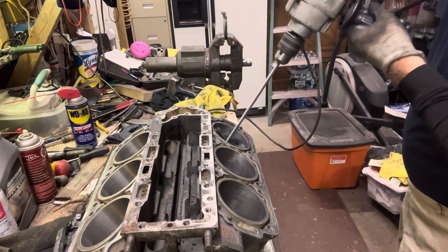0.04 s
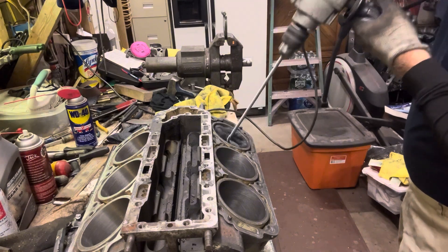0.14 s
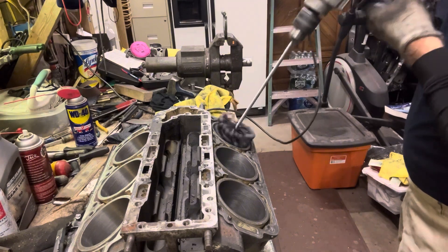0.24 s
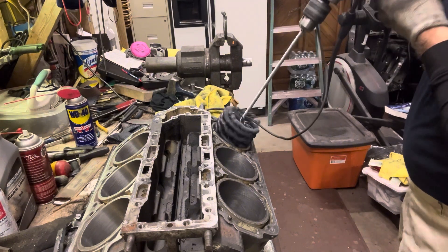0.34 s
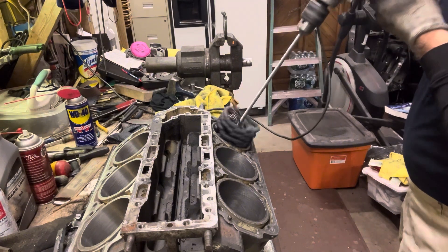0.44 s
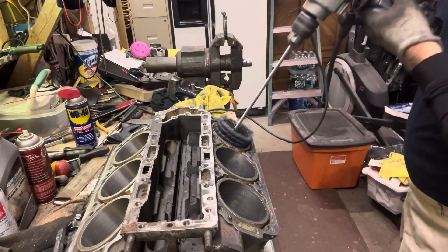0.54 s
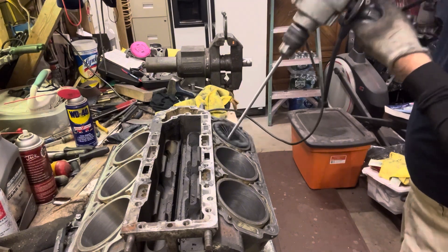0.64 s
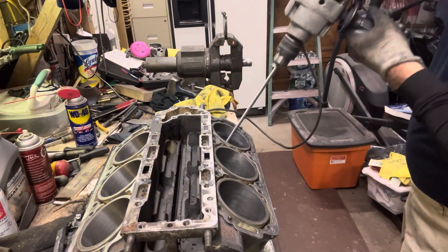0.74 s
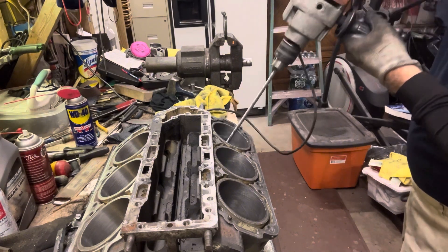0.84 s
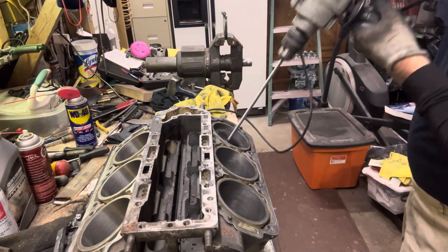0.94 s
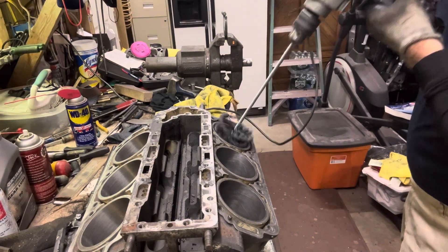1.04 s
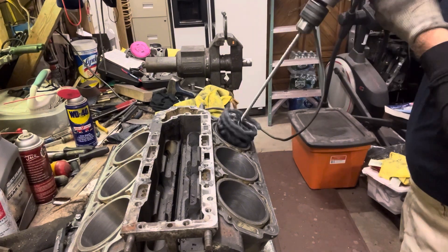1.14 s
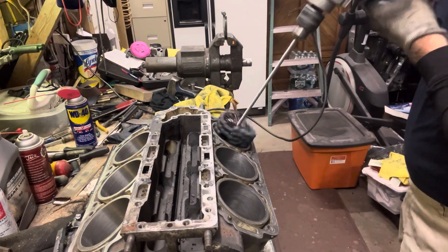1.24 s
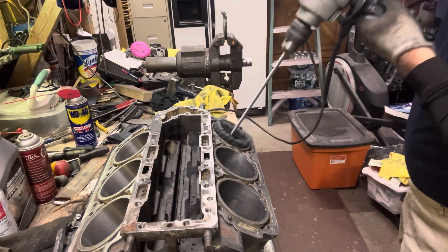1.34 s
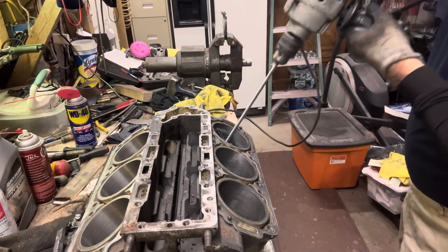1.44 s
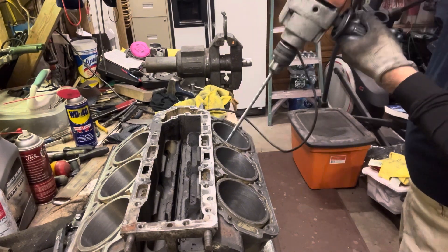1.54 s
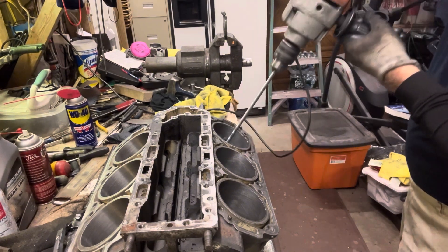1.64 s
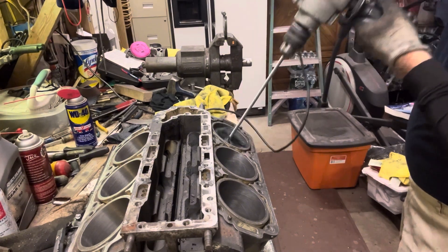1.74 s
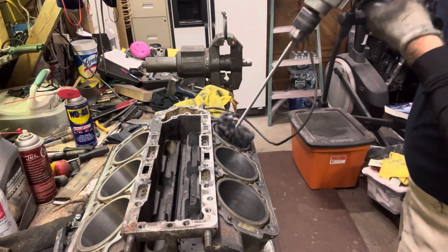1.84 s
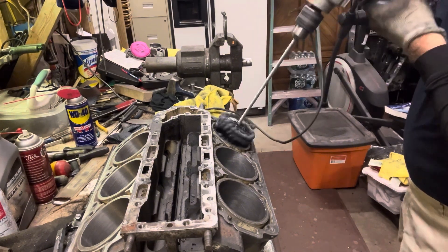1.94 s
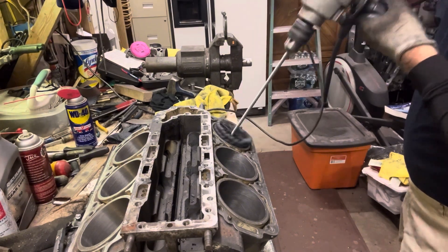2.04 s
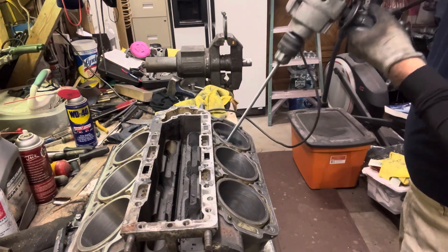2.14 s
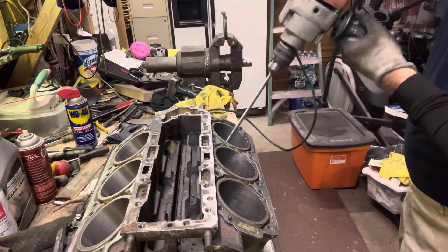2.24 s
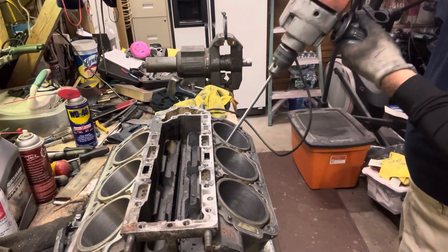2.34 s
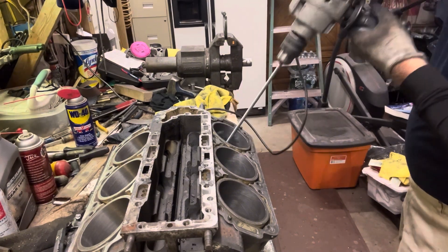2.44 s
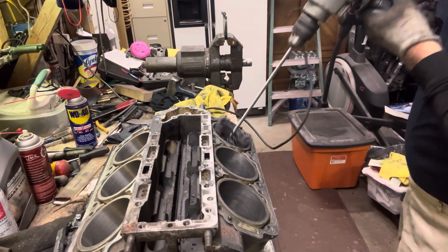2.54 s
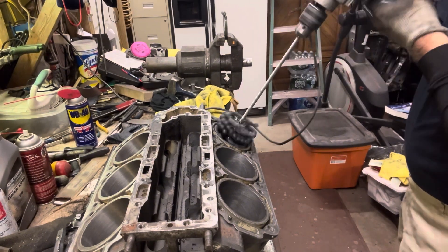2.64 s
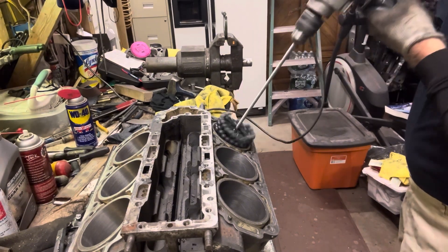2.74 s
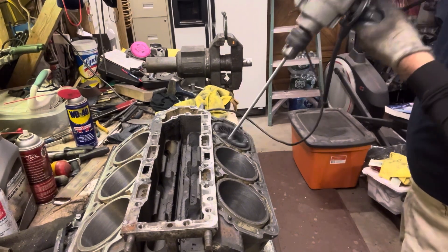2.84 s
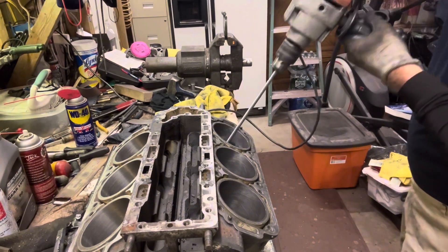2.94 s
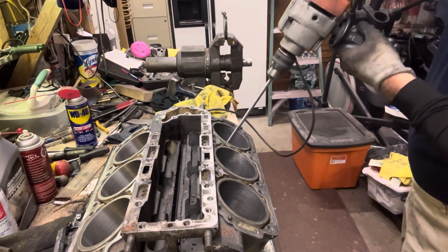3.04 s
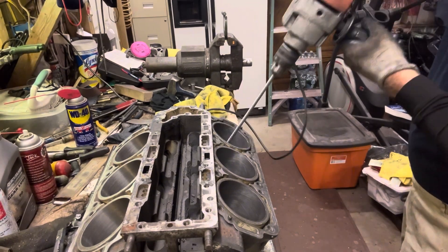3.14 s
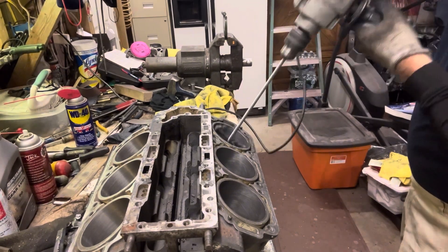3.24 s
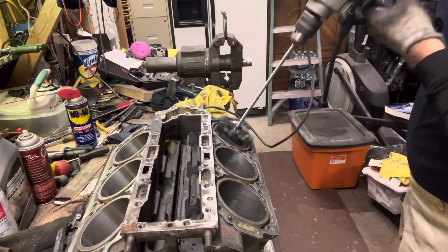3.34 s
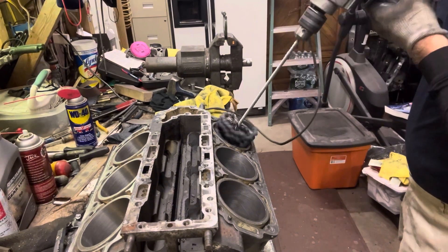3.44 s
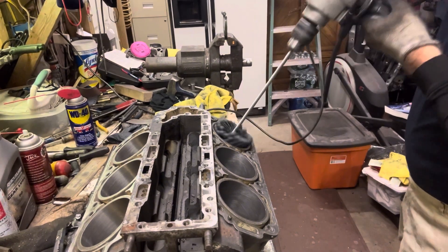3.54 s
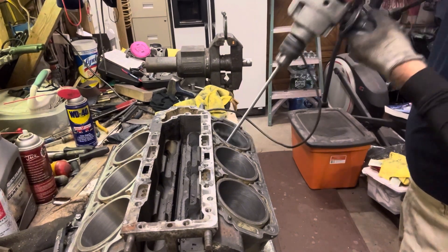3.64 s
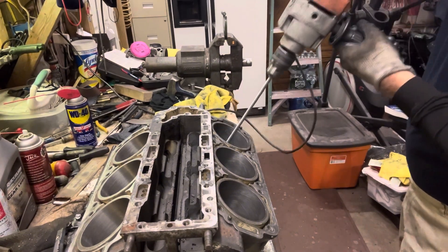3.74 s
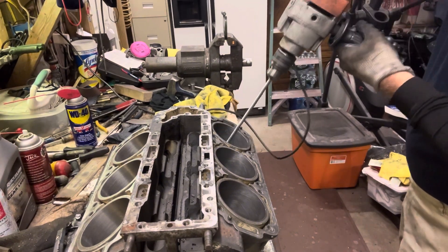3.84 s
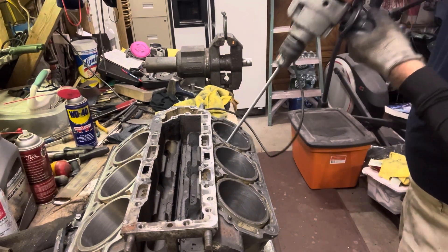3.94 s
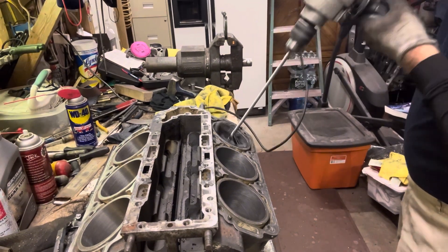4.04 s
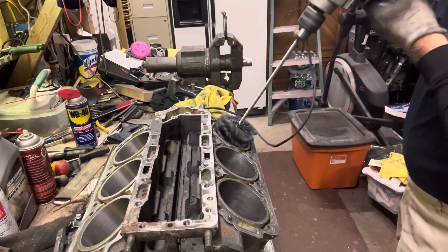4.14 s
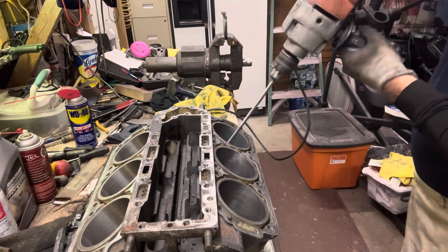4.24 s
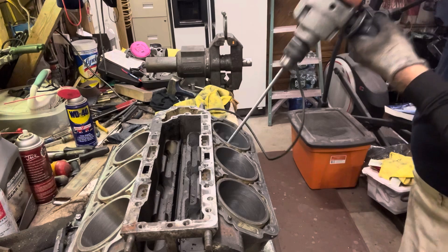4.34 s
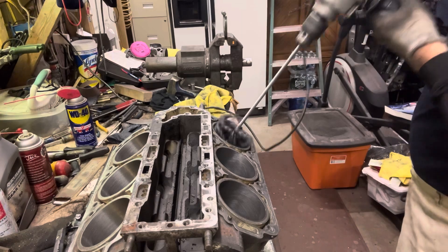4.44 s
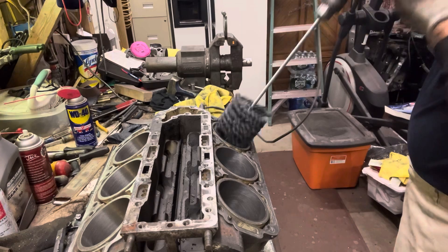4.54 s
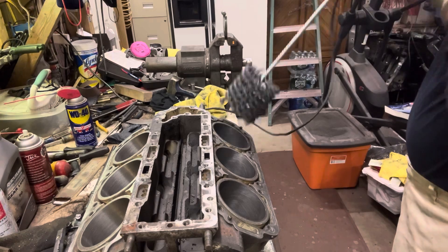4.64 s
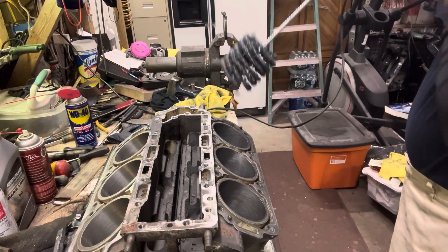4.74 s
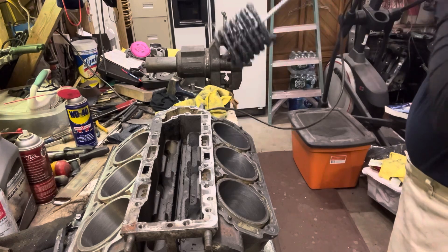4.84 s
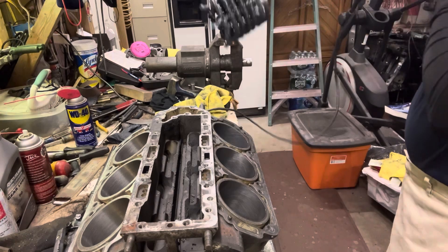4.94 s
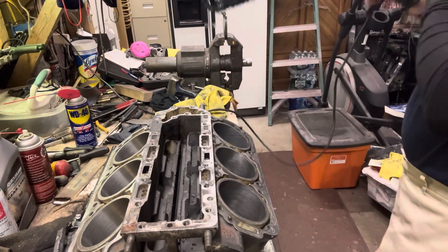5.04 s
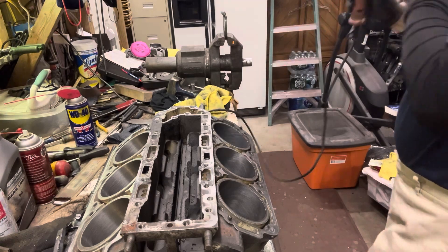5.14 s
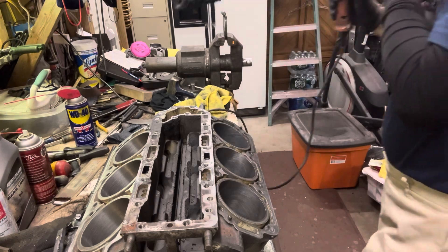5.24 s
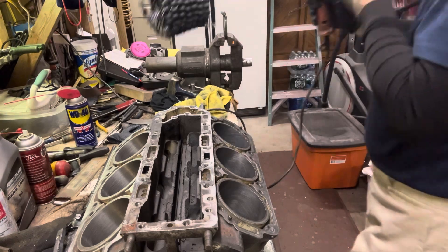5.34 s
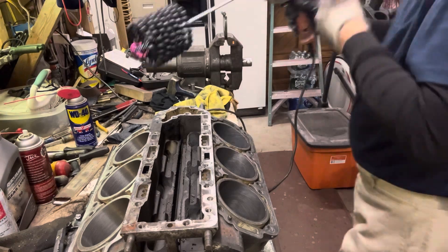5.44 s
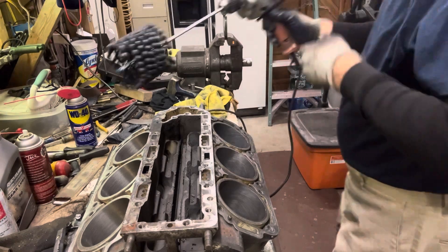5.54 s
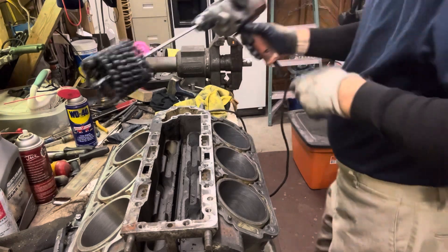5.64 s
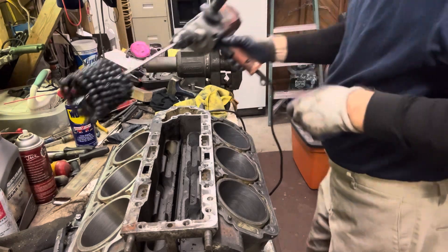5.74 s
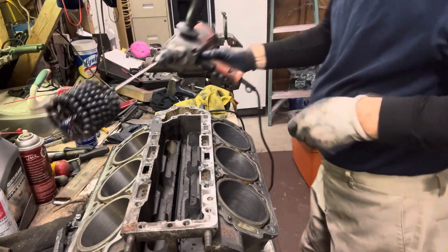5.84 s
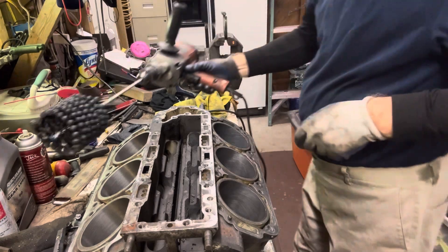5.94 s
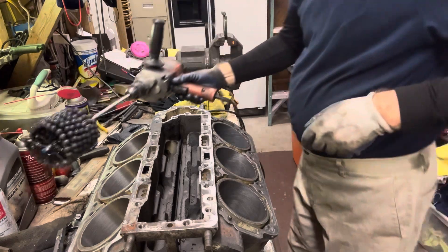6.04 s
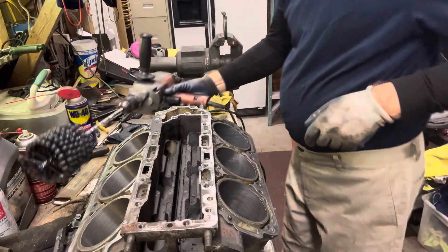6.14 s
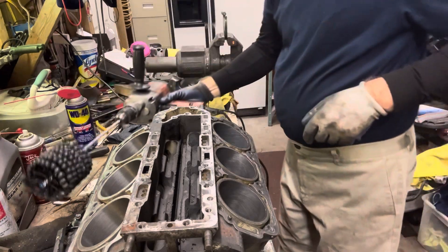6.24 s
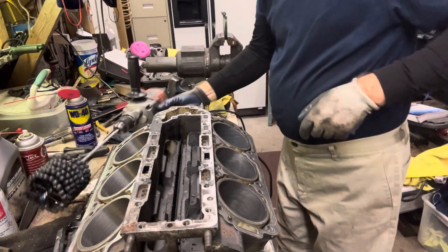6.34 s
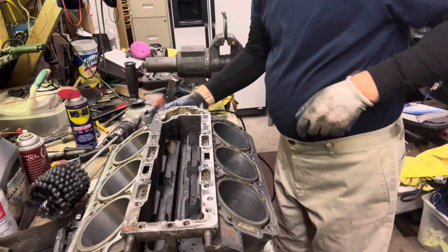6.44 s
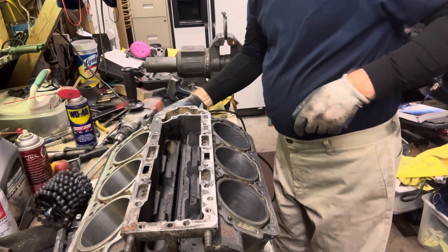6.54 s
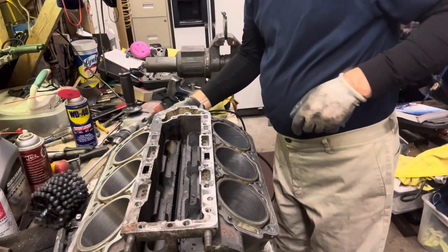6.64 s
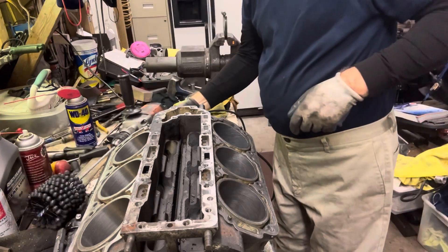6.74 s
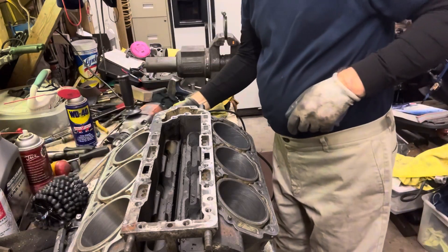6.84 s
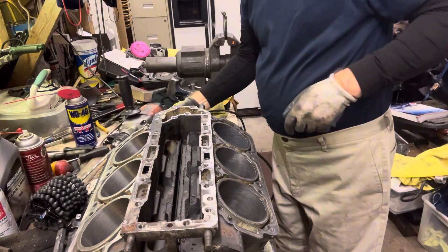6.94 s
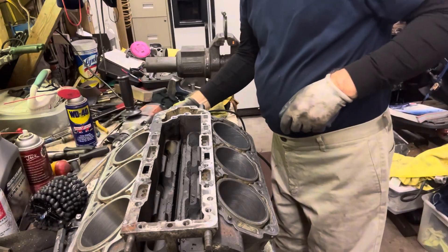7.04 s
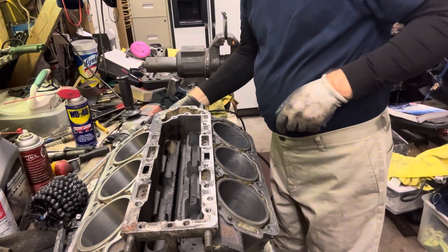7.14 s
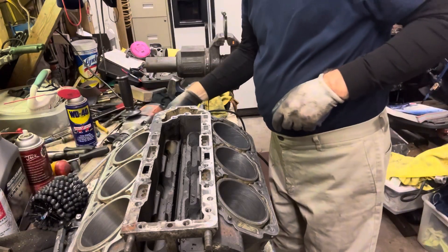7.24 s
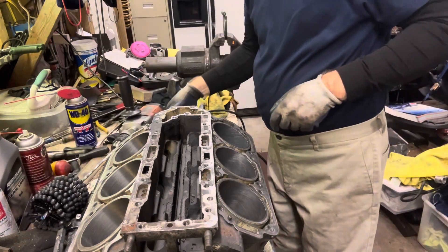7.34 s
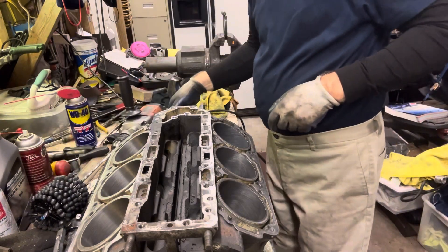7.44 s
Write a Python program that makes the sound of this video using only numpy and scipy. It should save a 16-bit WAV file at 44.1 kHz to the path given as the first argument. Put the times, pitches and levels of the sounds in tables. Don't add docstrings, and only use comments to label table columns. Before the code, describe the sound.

From the start, a corded drill runs at close range in a small cluttered workshop, with a nasal gear whine and singing fan. A ball hone scrapes an oiled iron bore, bright and gritty with a metallic ring, swelling in uneven strokes roughly two or three times a second; irregular snags roughen it. The pitch sags gradually from about 0.5 to 4 seconds, with soft low thumps near 3.9. Brief squeaks come at 4.2-4.4. At 4.5 the power is cut and the scraping drops away quickly. The fan tone glides down until about 5.6, while hard, springy clacks cluster at 4.56-4.7, then scatter until 5.35. Weak rattling and cloth swishes continue to 5.9, with bench knocks at 5.3-5.4 and 5.8. Afterwards it is quiet: low room hum, faint brushing, small knocks at 6.64 and 6.78, clicks around 7.15 and tiny ticks to 7.4.

```python
import sys
import numpy as np
from scipy import signal
from scipy.fft import rfft, irfft, next_fast_len
from scipy.io import wavfile
from scipy.ndimage import uniform_filter1d

SR = 44100
rng = np.random.default_rng(int(sys.argv[2]) if len(sys.argv) > 2 else 0)


def natural_amplitude(level_db):
    exponent = np.asarray(level_db, float) / 20
    return 10 ** exponent


def file_out(sig):
    cols = np.atleast_2d(sig).T
    lim = np.clip(cols, -1, 1)
    pcm = np.round(lim * 32767).astype(np.int16)
    wavfile.write(sys.argv[1], SR, pcm)


N = 330285
T = np.arange(N) / SR
HZ = np.fft.rfftfreq(next_fast_len(N + SR // 4), 1 / SR)
PAD = 2 * (len(HZ) - 1)
STEP = 64
TRIGGER_OFF_S = 4.505


def drill():
    # (level/dB unloaded, share of the load)
    gear = [(-53.4, .79), (-42.5, .78), (-48.9, 1.2), (-44.6, 1.05), (-51.9, 1.18)]
    # (level/dB at 100 turns per s, share of the load)
    fan_tones = [(-42.5, .2), (-42, .04), (-46.5, .27)]
    # (centre t/s, length/s, level/dB)
    gear_swells = [
        [(.15, .07, 4), (.02, .08, -7), (.86, .1, 2), (1.53, .14, 7), (1.78, .1, -9), (1.9, .4, -5),
         (2.5, .2, -2), (3.16, .08, 3), (3.75, .25, 4), (4.34, .1, 9)],
        [(.05, .15, 5), (.46, .1, 2), (.66, .12, 4), (.36, .08, -5), (.83, .1, 8), (.97, .06, -4), (1.4, .2, 3),
         (1.58, .07, -4), (1.95, .3, 4), (2.35, .15, -5), (2.6, .12, 5), (3.27, .1, -8), (3.44, .12, 7),
         (2.92, .12, -6), (3.85, .3, -6), (4.42, .1, -5)],
        [(.33, .1, -7), (.88, .12, 5), (.7, .1, -5), (1.75, .12, -5), (2.2, .1, -4), (2.35, .12, 10),
         (2.48, .07, -6), (.51, .06, 6), (3.09, .12, 6), (3.4, .12, -4), (3.6, .15, -3), (3.8, .12, -1),
         (4.26, .06, -4)],
        [(.07, .13, -9), (.4, .12, 5), (.6, .15, 3), (.9, .12, -5), (1.15, .08, 4), (1.35, .1, -7),
         (1.53, .09, 6), (1.8, .12, -6), (2.65, .12, 4), (2.3, .08, 5), (2.43, .08, -4), (2.85, .1, 4),
         (3.12, .08, -2), (3.2, .05, 3), (3.4, .2, -5), (3.93, .12, 5), (4.15, .07, 6)],
        [(.1, .1, -8), (1.9, .15, -3), (2.15, .1, -4), (2.36, .1, 3), (2.9, .12, -6), (3.1, .08, 3),
         (3.35, .15, -5), (3.85, .15, -6), (4.26, .05, 6)],
    ]
    # (centre t/s, length/s, level/dB)
    fan_swells = [
        [(.1, .15, 7), (.33, .12, 4), (.67, .08, -6), (2.35, .1, 5), (3.28, .12, -4), (3.95, .08, 4),
         (1.0, .3, -3), (1.2, .12, 7), (1.75, .3, 7), (2.1, .12, -2), (2.46, .3, 3), (3.5, .4, 2),
         (4.06, .1, -4), (4.33, .1, -5), (4.55, .1, 0), (4.72, .06, -3), (4.86, .06, 6), (5.02, .06, 4),
         (5.2, .14, 13)],
        [(.4, .3, -3), (.1, .2, 5), (.75, .1, 4), (1.78, .2, -6), (2.2, .4, -7), (3.9, .2, -4), (4.6, .08, -4),
         (4.55, .05, 4), (4.77, .12, 7)],
        [(1.9, .3, -4), (2.9, .2, -5), (3.4, .3, -6), (4.45, .08, -10), (4.7, .12, 8)],
    ]
    on = between(-1, TRIGGER_OFF_S, .08)
    gears = whine(gear, 7, .0014, 1.4, gear_swells) * on
    fan_db = slowing(2.1, 100) - 4.5 * (1 - on)
    too_slow_to_sing_s = 5.65
    fan = whine(fan_tones, 12, .001, 1.3, fan_swells) * natural_amplitude(fan_db)
    fan = fan * between(-1, too_slow_to_sing_s, .4)
    return natural_amplitude(.6) * (gears + fan)


def whine(table, teeth, wobble, flicker_db, swells):
    # (f/Hz, width/Hz, level/dB)
    resonances = [(582, 40, -2.1), (785, 40, 9.7), (999, 98, -1.4), (1329, 40, -5.6), (1569, 54, 0.1),
                  (1829, 220, 1.1), (2252, 94, 3.5), (2507, 52, 0.0), (2923, 76, 2.5), (3035, 56, 2.3),
                  (3225, 111, 2.9), (3328, 400, -10.2), (3886, 44, -2.7)]
    hz = teeth * speed()
    load_db = strokes(column=3)
    turn = 2 * np.pi * np.cumsum(hz * (1 + wobble * walk(40))) / SR
    coarse_hz = HZ[::STEP]
    power = sum(natural_amplitude(2 * db) / (1 + (2 * (coarse_hz - f) / width) ** 2) for f, width, db in resonances)
    case = np.sqrt(power)
    out = 0
    for k, ((db, share), changes) in enumerate(zip(table, swells), 1):
        swell_db = slow(lambda t: sum((change_db * bell(t, s, length) for s, length, change_db in changes), 0 * t))
        loudness = natural_amplitude(db + share * load_db + swell_db + flicker_db * walk(35))
        size = np.interp(k * hz, coarse_hz, case) * loudness
        out = out + np.sqrt(2) * size * np.sin(k * turn)
    return out


def speed():
    # (t/s, turns per s)
    turning = [(.17, 106.2), (.42, 114.5), (.7, 113.2), (.92, 109.4), (1.14, 112.4), (1.71, 94.8),
               (1.92, 95.8), (2.25, 91.5), (2.41, 86.8), (2.65, 91.5), (3.0, 89.2), (3.17, 85),
               (3.42, 88.7), (3.74, 85.8), (3.91, 81.3), (4.17, 87.2), (4.31, 82.2), (4.42, 84.7)]
    drag, inertia_s = 60, .06
    coasting_s = np.maximum(T - TRIGGER_OFF_S, 0)
    turns = np.interp(T, *np.transpose(turning)) - drag * coasting_s
    return np.maximum(uniform_filter1d(turns, int(inertia_s * SR)), 1)


def slowing(power, turns):
    return power * 20 * np.log10(speed() / turns)


def strokes(column):
    # (centre t/s, length/s, pressure on the wall level/dB, load on the gears level/dB)
    pushes = [(0.07, 0.256, 5.1, 13.3), (0.501, 0.215, 3.9, 8.9), (0.643, 0.1, 1.2, 3.4),
              (0.859, 0.297, 4.8, 10.1), (1.283, 0.14, 4.7, 8.8), (1.556, 0.244, 3.9, 16.0),
              (1.971, 0.289, 2.1, 6.3), (2.334, 0.295, 4.0, 12.3), (2.781, 0.102, 2.9, 4.1),
              (3.062, 0.3, 3.2, 12.1), (3.481, 0.25, 1.4, 8.0), (3.815, 0.263, 4.0, 12.9),
              (4.247, 0.058, 2.2, 12.7), (4.35, 0.16, 2.7, 0.0)]
    return slow(lambda t: sum(row[column] * bell(t, *row[:2]) for row in pushes))


def hone():
    # (f/Hz, level/dB per Hz)
    scrape_colour = [(90, -52.5), (150, -19), (264, -17), (576, -6), (803, -3), (920, -5.5), (1560, -5),
                     (2590, -1), (3140, 0), (3500, -4), (4550, -7), (8340, 2), (11800, 0.5), (15900, -10.5)]
    # (f/Hz, width/Hz, level/dB)
    block = [(1873, 86, -1), (2220, 90, -27), (3085, 50, -19), (3195, 40, -29), (3860, 45, -5.5),
             (4300, 25, -21.5), (4960, 100, -2.5), (5420, 110, -5), (6330, 88, -5), (6900, 270, -0.5),
             (7650, 110, -10), (8180, 130, -7.5)]
    # (t/s, lift of the grit level/dB, length/s)
    snags = [(0.68, 3, .022), (.816, 2, .04), (.982, 2.5, .03), (1.058, 3.5, .02), (1.273, 4.5, .018),
             (1.501, 6, .016), (1.989, 4, .016), (2.021, 3, .012), (2.175, 5, .012), (2.345, 5.5, .014),
             (2.393, 6.5, .022), (2.525, 5.5, .012), (2.548, 3, .014), (2.728, 3.5, .014), (2.792, 2, .04),
             (2.971, 6, .025), (3.137, 3, .035), (3.32, 4, .02), (3.58, 3.5, .012), (3.686, 4.5, .035),
             (3.772, 3, .012), (3.951, 4.5, .012), (4.043, 3, .025), (4.394, 4.5, .035), (4.46, 2, .05)]

    def pulled_db(lag_s):
        pull_s, db_per_s = 4.46, -250
        return db_per_s * np.maximum(T - pull_s - lag_s, 0)

    stroke_db = strokes(column=2)
    snag_db = slow(lambda t: sum(1.15 * db * bell(t, s, length) for s, db, length in snags))
    scrape_db = -32.8 + stroke_db + .3 * snag_db + pulled_db(0)
    rumble_db = -38 + .2 * stroke_db + slowing(1.9, 100) + .4 * pulled_db(-.11)
    grit_db = -35.6 + .9 * stroke_db + snag_db + slowing(.4, 92) + pulled_db(.045)
    reduction = 9
    chuck = 2 * np.pi * np.cumsum(speed()) / SR / reduction
    fits = walk(25.395)
    press_db = 0.33 * np.sin(chuck) + 0.86 * fits

    contact = rng.standard_normal(N) + set_level(grains(2500, 4.5), -4.5)
    ring = sum(natural_amplitude(db - 3) * peak(hz, width) for hz, width, db in block)
    wall = gain(scrape_colour) * (1 + ring)
    out = set_level(shape(contact, wall * band(30, 400)), -16) * natural_amplitude(rumble_db)
    ringing_db = scrape_db + slowing(2, 100) + 2.5 * fits + .3 * pulled_db(-.09)
    out = out + set_level(shape(contact, peak(3130, 330) ** 2), -16.5) * natural_amplitude(ringing_db)
    # (low Hz, high Hz, level dB, share of the throb, flicker dB)
    layers = ((300, 1440, rumble_db, 0.18, 0.6), (1500, 5240, scrape_db, .8, 1.1),
              (5300, 48000, grit_db, 0.35, 1.6))
    for lo_hz, hi_hz, db, throb, flicker_db in layers:
        sound = set_level(shape(contact, wall * band(lo_hz, hi_hz)), 0)
        out = out + sound * natural_amplitude(db + throb * press_db + flicker_db * walk(90))
    return out


def squeaks():
    # (centre t/s, length/s, f/Hz at the centre, glide/Hz per s, level/dB)
    lip = [
        (4.232, .022, 1770, -300, -31),
        (4.3, .09, 1870, 550, -39),
        (4.38, .06, 845, -500, -43),
    ]
    out = 0
    for s, length, hz, glide, db in lip:
        turn = 2 * np.pi * (hz + glide * (T - s) / 2) * (T - s)
        out = out + np.sqrt(2) * natural_amplitude(db) * bell(T, s, length) * np.sin(turn)
    return out


def clacks():
    # (t/s, peak level/dB, ring f/Hz, low knock level/dB, tick level/dB)
    hits = [(4.5623, -28, 3390, -42.5, -49.5), (4.5792, -22, 3300, -49.5, -45),
            (4.6053, -18.5, 3300, -72.5, -37), (4.6314, -22, 3440, -47, -35),
            (4.6521, -24, 3300, -47.5, -55.5), (4.675, -24, 3600, -54, -45.5), (4.768, -35, 3220, -87, -59),
            (4.8464, -31, 3010, -56, -48.5), (4.9216, -25.5, 3200, -48, -41),
            (4.9883, -38.5, 3370, -67, -54.5), (5.03, -29, 3270, -56, -43.5), (5.0716, -33, 3200, -56, -54),
            (5.124, -29, 3310, -33, -40.5), (5.1536, -33, 3310, -37, -47.5),
            (5.1825, -35, 3400, -52.5, -50.5), (5.2253, -37, 3150, -45.5, -44),
            (5.2883, -36, 2760, -35, -47.5), (5.343, -44, 3600, -42, -42)]
    # (delay t/s, level/dB)
    echoes = [
        (.0006, .3),
        (.0065, -13),
        (.013, -14),
    ]
    out, t = np.zeros(N + 4096), T[:4096]
    push_s = .0009
    push = (t / push_s * np.exp(1 - t / push_s)) ** 2
    for s, db, hz, _, _ in hits:
        for lag_s, echo_db in echoes:
            start = int((s + lag_s) * SR)
            out[start:start + 4096] += natural_amplitude(db + echo_db) * push * np.sin(2 * np.pi * hz * t)
    s, db, _, knock_db, tick_db = np.transpose(hits)
    bounce = bursts(s, db - 15, .1, .003, band(3000, 3700) ** 2)
    knock = bursts(s, knock_db, 0.025, 0.0012, peak(1320, 150) + peak(1720, 200))
    tick = bursts(s, tick_db, 0.021, 0.000287, band(4500, 11500))
    return out[:N] + bounce + knock + tick


def rattle():
    # (t/s, level/dB)
    contacts = [(5.4038, -37), (5.4527, -39), (5.4816, -41), (5.5614, -43.5), (5.5814, -48),
                (5.6048, -46.5), (5.6323, -41.5), (5.6682, -44), (5.69, -48), (5.7316, -44), (5.763, -41),
                (5.785, -46), (5.8129, -47), (5.8672, -46), (5.8862, -51), (5.9131, -50)]
    s, db = np.transpose(contacts)
    return bursts(s, db + 2.5, .04, 0.003, balls() + .03 * band(1000, 4500))


def thumps():
    # (t/s, level/dB, f/Hz, ring/s)
    blows = [(3.81, -26, 86, .1), (3.941, -30, 55, .1), (4.535, -38, 630, .1), (5.305, -47, 900, .08),
             (5.315, -48, 590, .08), (5.315, -46, 385, .1), (5.53, -40, 248, .1), (5.952, -37, 247, .1),
             (6.191, -49, 300, .1), (6.777, -50, 1150, .04), (7.147, -47, 4250, .045),
             (7.147, -48, 3750, .05), (7.146, -49, 3200, .04)]
    out, t = np.zeros(N + 4096), T[:4096]
    for s, db, hz, t60 in blows:
        swell = 1 - decay(t, .3 * t60)
        start = int(s * SR)
        out[start:start + 4096] += natural_amplitude(db) * decay(t, t60) * np.sin(2 * np.pi * hz * t) * swell
    return out[:N]


def touches():
    # (t/s, body level/dB, low knock level/dB, tick level/dB)
    contacts = [(5.31, -50, -43, -52), (5.404, -42, -50, -49), (5.797, -56, -50, -58),
                (5.815, -45, -40, -54), (5.83, -51, -45, -62), (5.85, -56, -53, -65),
                (6.018, -64, -63, -72), (6.1374, -66, -53, -73.5), (6.4655, -59, -63, -58.5),
                (6.5584, -63, -57, -43.5), (6.6426, -42, -45, -55.5), (6.7555, -60, -63, -62),
                (6.779, -39, -45, -51), (7.147, -51, -60, -57), (7.158, -50, -60, -57),
                (7.232, -61.5, -65, -59), (7.435, -62, -66, -68)]
    s, body_db, knock_db, tick_db = np.transpose(contacts)
    knock = bursts(s, knock_db, 0.07, 0.0015, band(610, 1540))
    body = bursts(s, body_db, 0.03, 0.0012, band(1700, 3500) ** 2)
    click = snaps(s + .001, tick_db + 10, band(6500, 12000)) + snaps(s + .002, body_db, band(900, 6000))
    tick = bursts(s, tick_db + 1, 0.013, .0002, band(4600, 11500))
    return knock + body + click + tick


def balls():
    # (f/Hz, width/Hz, level/dB)
    modes = [(1270, 120, -8), (1740, 130, 2), (2580, 120, 2), (3280, 190, -5)]
    return sum(natural_amplitude(db) * peak(hz, width) for hz, width, db in modes)


def loose():
    # (f/Hz, level/dB per Hz)
    chatter_colour = [(240, -50), (400, -7.5), (459, 1.5), (690, 4), (770, 3.5), (962, -1.5), (1240, -9.5),
                      (2800, 3.5), (3310, -7), (5000, -64), (6500, -54), (11000, -120)]
    # (f/Hz, level/dB per Hz)
    rustle = [(2060, -29), (3500, -4), (6840, -0.5), (9630, -2), (11700, -9.5), (13000, -10.5),
              (15900, -18)]
    # (t/s, time to swell 20 dB/s, time to fade 20 dB/s, brush level/dB, hiss level/dB)
    cloth = [(5.35, .02, .12, -62, -57), (5.41, .01, .15, -60, -59), (6.02, .03, .04, -74, -79),
             (6.15, .025, .3, -65, -72), (6.28, .3, .1, -70, -79), (6.47, .012, .2, -72, -69),
             (6.555, .012, .15, -67, -73), (6.65, .01, .2, -70, -73), (6.76, .05, .11, -66, -66),
             (7.09, .18, .3, -71, -74), (7.155, .05, .08, -68, -62), (7.24, .03, 1.5, -73, -74)]
    rest_s = 5.92
    gate = between(TRIGGER_OFF_S - .04, rest_s + .03, .05)
    coasting_s = T - TRIGGER_OFF_S
    whirr = set_level(shape(rng.standard_normal(N), gain(chatter_colour)), -5)
    knocks = set_level(shape(grains(350, 1.6), balls() + .16 * band(1000, 4500)), -6.5)
    chatter = (whirr + knocks) * gate * natural_amplitude(-37 - 17.5 * coasting_s + 1.8 * walk(30))

    brushing, hissing = natural_amplitude(-80) * (T > rest_s), gate * natural_amplitude(-46.5 - 20 * coasting_s)
    for s, swell, fade, brush_db, hiss_db in cloth:
        move = natural_amplitude(-20 * np.where(T < s, (s - T) / swell, (T - s) / fade))
        brushing = brushing + move * natural_amplitude(brush_db)
        hissing = hissing + move * natural_amplitude(hiss_db)
    hiss = shape(rng.standard_normal(N) + set_level(grains(1600, 1.3), -0.5), gain(rustle))
    hiss = set_level(hiss, 0) * natural_amplitude(1.9 * walk(28)) * hissing
    brush = set_level(shape(rng.standard_normal(N), band(470, 3300)), 0) * brushing
    return chatter + hiss + brush


def shop():
    # (f/Hz, level/dB per Hz)
    tone = [(15, -41.5), (25, -9.5), (76, -1), (151, -12.5), (274, -13.5), (557, -20.5), (665, -33),
            (777, -24.5), (907, -26.5), (1320, -31.5), (1410, -32.5), (2110, -36.5), (3000, -46),
            (5000, -63), (11000, -72)]
    # (f/Hz, width/Hz, level/dB)
    appliances = [
        (58.1, 9, -49.5),
        (238.7, 18, -57),
    ]
    middle, side = (set_level(shape(rng.standard_normal(N), gain(tone)), -49) for _ in range(2))
    hum = 0
    for hz, width, db in appliances:
        hum = hum + set_level(shape(rng.standard_normal(N), peak(hz, width) ** 3), db)
    wide = shape(side, gain([(60, -6), (300, -5.5), (900, 0)]))
    balance = natural_amplitude(np.array([[1.2], [-1.2]]))
    return (middle + hum + wide * np.array([[1], [-1]])) * balance


def room(x, t60, wet_db, hold_s):
    t, hop = T[:int(.25 * SR)], int(hold_s * SR)
    out = np.zeros((2, N + 3 * hop + len(t)))
    padded = np.pad(x, (hop, 2 * hop))
    crossfade = np.sin(np.pi * np.arange(2 * hop) / (2 * hop))
    for start in range(0, N + hop, hop):
        tail = rng.standard_normal((2, len(t))) * decay(t, t60) * (t > .003)
        tail *= natural_amplitude(wet_db) / np.sqrt(np.sum(tail ** 2, axis=1, keepdims=True))
        piece = padded[start:start + 2 * hop] * crossfade
        echo = signal.fftconvolve(piece[None], tail, axes=1)
        out[:, start:start + echo.shape[1]] += echo
    return out[:, hop:hop + N]


def ports(x):
    # (f/Hz, left lead/radians)
    leads = [(0, 0), (780, -2.1), (1300, -1), (1900, -2.4), (2300, -1.7), (2520, -2.6), (2720, -4.5),
             (2950, -4.1), (3190, -5.1), (3700, -5), (4650, -7.7), (5340, -7.4), (7150, -8.8), (7670, -6.4),
             (11600, -6.2), (12400, -4.4), (13600, -3.2), (14900, -3.1), (15300, -2.4)]
    # (f/Hz, left minus right level/dB)
    tilt = [(60, 8.5), (110, 0), (200, 11.5), (380, -2.5), (700, -2.0), (1290, -3), (2380, 1.5),
            (4400, 0.0), (8120, -4.5), (15000, 0.5)]
    hz, lead = np.transpose(leads)
    half = np.exp(.5j * np.interp(HZ, hz, lead)) * np.sqrt(gain(tilt))
    return np.array([shape(x, half), shape(x, 1 / half)])


def bursts(times, dbs, t60, rise_s, response):
    t = T[:4096]
    envelope = decay(t, t60) * (1 - np.exp(-t / rise_s))
    noise = set_level(shape(rng.standard_normal(N), response), 0)
    return signal.fftconvolve(impulses(times, dbs), envelope)[:N] * noise


def snaps(times, dbs, response):
    return shape(impulses(times, dbs), response) / np.max(np.abs(irfft(response)))


def impulses(times, dbs):
    blows = np.zeros(N)
    blows[(np.asarray(times) * SR).astype(int)] = natural_amplitude(np.asarray(dbs))
    return blows


def grains(rate, spread_db):
    hit = rng.random(N) < rate / SR
    hardness_db = spread_db * np.minimum(rng.exponential(size=N), 3.3)
    return hit * rng.standard_normal(N) * natural_amplitude(hardness_db)


def walk(rate):
    k = max(int(SR / rate), 2)
    held = np.repeat(rng.standard_normal(N // k + 1), k)
    return 1.3 * uniform_filter1d(uniform_filter1d(held, k), k)[:N]


def decay(t, t60):
    return np.exp(-np.log(1000) * t / t60)


def bell(t, s, length):
    return np.exp(-2 * ((t - s) / length) ** 2)


def between(start_s, end_s, edge_s):
    return np.clip((T - start_s) / edge_s, 0, 1) * np.clip((end_s - T) / edge_s, 0, 1)


def slow(rule):
    return np.interp(T, T[::STEP], rule(T[::STEP]))


def set_level(x, db):
    return x * natural_amplitude(db) / np.sqrt(np.mean(x ** 2))


def gain(points):
    hz, db = np.transpose(points)
    return natural_amplitude(np.interp(np.log(HZ + 1), np.log(hz), db))


def band(lo_hz, hi_hz):
    return 1 / np.sqrt((1 + (lo_hz / (HZ + 1)) ** 8) * (1 + (HZ / hi_hz) ** 8))


def peak(hz, width):
    return 1 / (1 + 1j * (HZ - hz * hz / (HZ + 1)) / width)


def shape(x, response):
    return irfft(rfft(x, PAD) * response, PAD)[:N]


def scene():
    motor = drill() + squeaks()
    tool = hone() + loose()
    hits = clacks() + thumps() + rattle() + touches()
    walls = room(shape(tool + .3 * motor + .4 * hits, band(300, 11000)), .15, -.5, .15)
    direct = ports(tool + motor + natural_amplitude(.6) * hits)
    return natural_amplitude(0.2) * (direct + walls) + shop()


def top_cut(x):
    return signal.sosfilt(signal.butter(12, 16020, fs=SR, output="sos"), x)


def record(dry):
    # (f/Hz, gain of the left-right difference level/dB)
    width = [(60, 0), (7500, 0), (7950, -19), (11200, -18.5), (11900, 3), (14600, 3), (15100, -3),
             (15600, -12), (15900, -24)]
    # (t/s, length/s, level/dB, not used)
    patches = [(0.216, 0.122, -46), (0.493, 0.076, -51), (0.958, 0.054, -47), (1.024, 0.092, -47),
               (1.72, 0.056, -55), (2.047, 0.056, -53), (2.141, 0.054, -51), (2.301, 0.096, -46),
               (2.502, 0.062, -48), (2.662, 0.08, -54), (2.86, 0.056, -56), (2.997, 0.104, -48),
               (3.115, 0.056, -51), (3.185, 0.22, -51), (3.416, 0.054, -56), (3.905, 0.076, -43),
               (3.999, 0.072, -47), (4.188, 0.162, -46), (4.5, 0.06, -64), (4.9, .06, -62), (5.2, .07, -62)]
    open_s = [.25, 1.0, 2.533, 3.32, 3.945, 4.64, 5.13, 6.77, 7.16]
    edges = band(38, 20000) * np.clip((15950 - HZ) / 150, 0, 1)
    mid = shape((dry[0] + dry[1]) / 2, edges)
    side = shape((dry[0] - dry[1]) / 2, edges * gain(width))
    low, edge, gap = (shape(mid, np.clip((hz - HZ) / 200, 0, 1)) for hz in (12800, 13450, 15250))
    patch = sum(between(s + .021, s + length - .021, .005) for s, length, _ in patches)
    opening = sum(between(s - .035 / 2, s + .035 / 2, .008) for s in open_s)
    ragged = np.clip(4 * (walk(25) + .4) + opening, 0, 1)
    top = natural_amplitude(13) * np.minimum(patch + opening, 1) * (mid - gap)
    mid = low + ragged * (edge - low) + natural_amplitude(10) * opening * (gap - edge) + top
    return top_cut(np.array([mid + side, mid - side]))


dry = scene()
out = record(dry)
file_out(out)
```